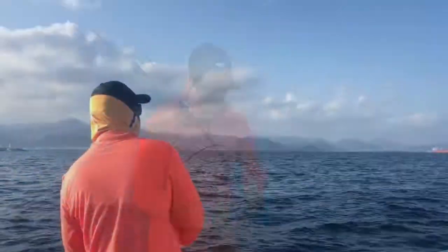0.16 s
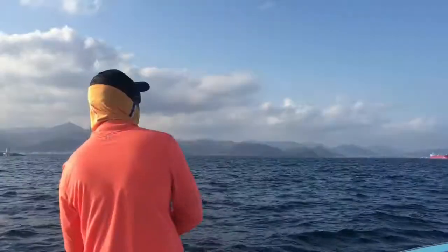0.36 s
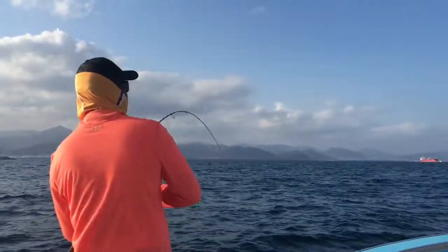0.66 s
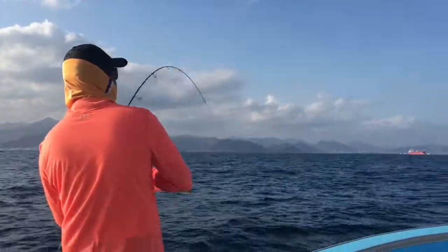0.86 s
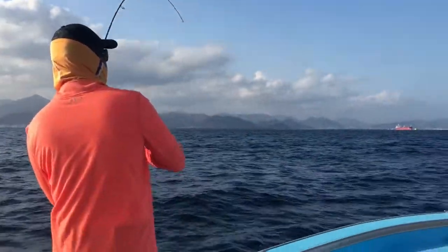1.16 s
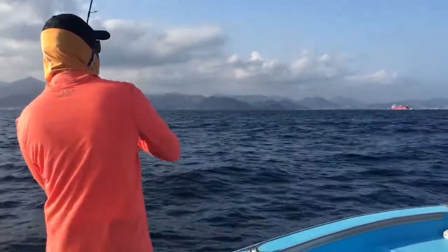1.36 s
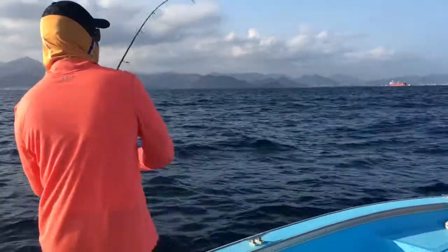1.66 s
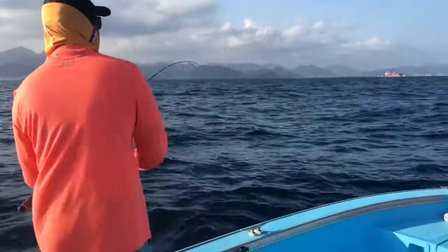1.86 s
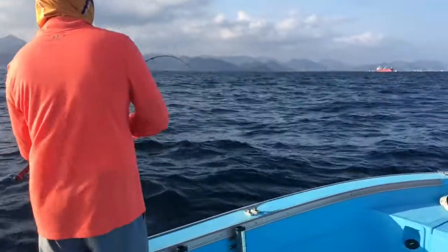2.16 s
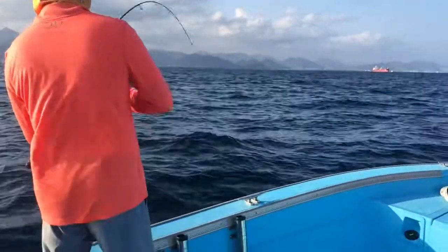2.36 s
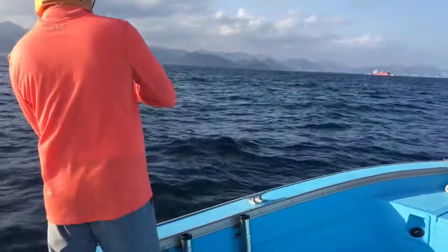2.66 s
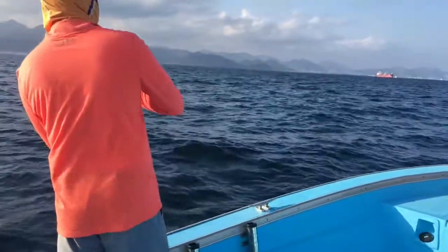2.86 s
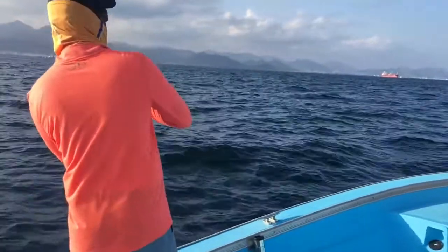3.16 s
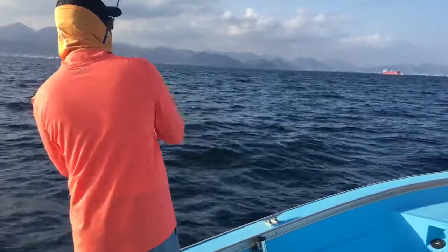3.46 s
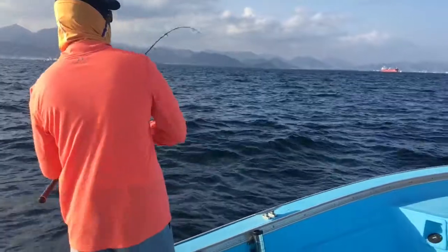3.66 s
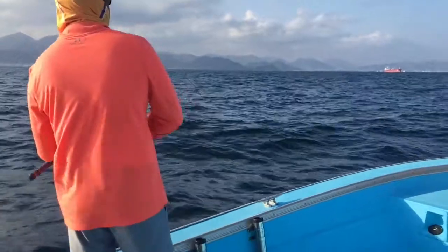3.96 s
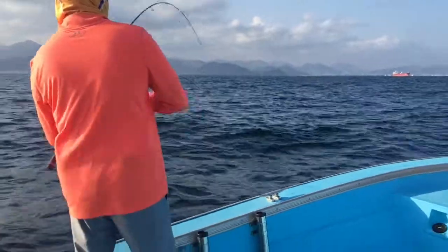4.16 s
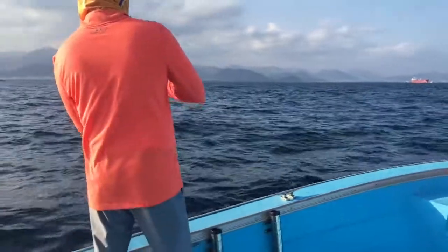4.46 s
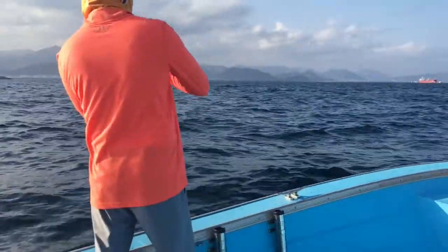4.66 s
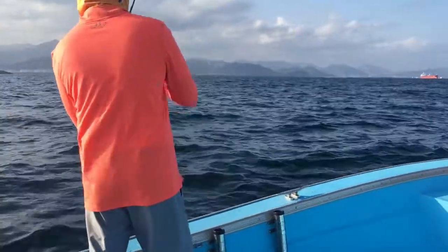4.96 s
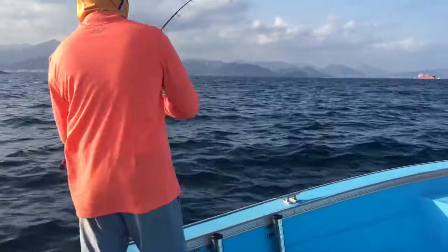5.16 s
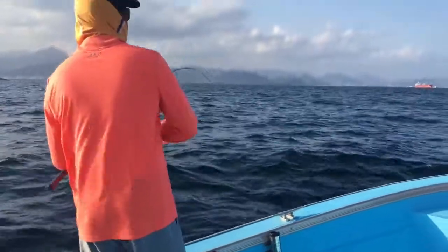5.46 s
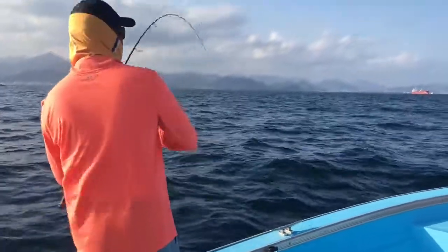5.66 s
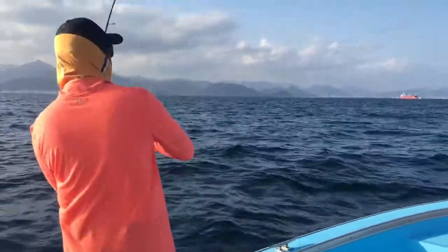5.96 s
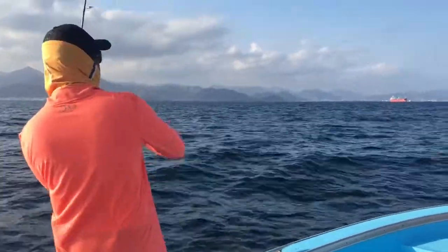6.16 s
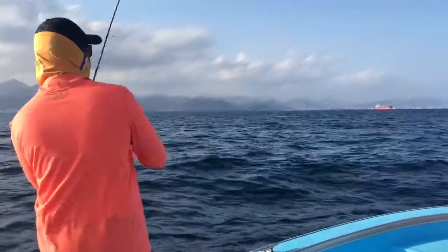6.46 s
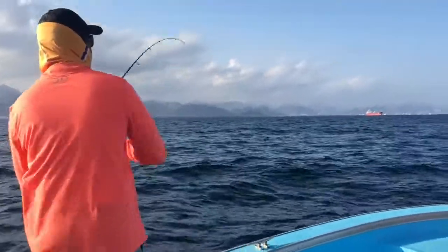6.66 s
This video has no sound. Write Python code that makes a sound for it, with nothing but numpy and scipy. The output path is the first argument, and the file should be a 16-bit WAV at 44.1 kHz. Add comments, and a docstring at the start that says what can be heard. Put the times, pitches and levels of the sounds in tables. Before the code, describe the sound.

Hollow deck knocks, hard clicks and scrapes of fishing gear on a small boat, with wind buffeting and waves slapping the hull.

```python
"""Fishing gear knocks, clicks and scrapes on the hollow deck of a small open boat on a choppy sea.
The blows ring deck and panel resonances; clicks and scrapes are short bursts of shaped noise.
Waves wash, slap and gulp along the hull: shaped noise, clusters of bubble tones and single air pockets.
A freshening wind buffets the microphone with deep noise and thumps, while an idling engine hums faintly
as a few wavering sines. A thin, airy whistle of narrow noise comes and goes."""
import sys
import numpy as np
from scipy import signal
from scipy.fft import rfft, irfft, next_fast_len
from scipy.io import wavfile
from scipy.ndimage import uniform_filter1d, map_coordinates

SR = 44100
rng = np.random.default_rng(int(sys.argv[2]) if len(sys.argv) > 2 else 0)


def unload_wav(signal):
    """Save mono or channel-first audio to the path in sys.argv[1] as 16-bit WAV at rate SR, clipped to [-1, 1]."""
    wavfile.write(
        sys.argv[1],
        SR,
        np.round(np.clip(np.atleast_2d(signal).T, -1, 1) * 32767).astype(np.int16),
    )


N = 300321  # length in samples


def amp(db):
    """Turn decibels into a gain."""
    return 10 ** (np.asarray(db) / 20)


def unit(x):
    """Scale to an rms of 1."""
    return x / np.sqrt(np.mean(x ** 2) + 1e-20)


def curves(rows):
    """Draw straight lines between the rows: one curve for each column after the time."""
    s, *cols = np.transpose(rows)
    return [np.interp(np.arange(N) / SR, s, c) for c in cols]


def wobble(rate, size=N):
    """A smooth random curve through `rate` random points a second."""
    points = rng.standard_normal(int(size * rate / SR) + 4)
    return map_coordinates(points, [np.arange(size) * rate / SR])


def swell(t, rise, fall):
    """A bell-shaped rise to 1 at t = 0, then an exponential fall."""
    return np.exp(-np.where(t < 0, (t / rise) ** 2, np.abs(t) / fall))


def filtered(x, response):
    """Multiply the spectrum of x by a response that depends on frequency."""
    m = next_fast_len(len(x) + SR // 8)
    return irfft(rfft(x, m) * response(np.fft.rfftfreq(m, 1 / SR)), m)[:len(x)]


def coloured(x, spectrum):
    """Shape x by (frequency in Hz, level in dB) points, at an rms of 1."""
    f, db = np.transpose(spectrum)
    return unit(filtered(x, lambda hz: amp(np.interp(np.log(hz + 1), np.log(f), db))))


def resonances(modes, f):
    """Combined response of resonances (Hz, width in Hz, dB), with alternating signs."""
    total = 0
    for k, (c, w, db) in enumerate(modes):
        total = total + (-1) ** k * amp(db) * 1j * f * w / (c * c - f * f + 1j * f * w)
    return total


def patchy(patchy_db):
    """White noise with drifting patches of gain in time and frequency."""
    z = signal.stft(rng.standard_normal(N), nperseg=512)[2]
    field = uniform_filter1d(rng.standard_normal(z.shape), size=6, axis=0)
    field = uniform_filter1d(field, size=8, axis=1)
    return signal.istft(z * amp(patchy_db * unit(field)), nperseg=512)[1][:N]


def add(track, s, sound):
    """Mix a sound into the track from time s in seconds."""
    start = int(np.clip(round(s * SR), 0, N))
    track[start:start + len(sound)] += sound[:N - start]


def bubbles(times, hz, sizes, cycles, glide):
    """Damped sines that rise in pitch as each bubble nears the surface."""
    t = np.arange(SR // 32) / SR
    age = hz[:, None] * t / cycles  # at age 1 the ring has faded by 60 dB
    tone = np.sin(2 * np.pi * cycles * age * (1 + glide * age / 2))
    rings = sizes[:, None] * tone * amp(-60 * age) * (1 - np.exp(-20 * age))
    where = (times * SR).astype(int)[:, None] + np.arange(len(t))
    return np.bincount(where.ravel(), rings.ravel())


def engine():
    """The idling engine hums as a few sines that waver a little in speed and strength."""
    # Engine tones. Each row: frequency in Hz, rms level in dB before the wavering.
    hum = [(110.5, -47.5), (148, -40.5), (252, -54.5)]
    clock = np.cumsum(1 + 0.0047 * wobble(2.97)) / SR  # shared, so the tones drift together
    out = np.zeros(N)
    for hz, db in hum:
        out += amp(db + 0.4 * wobble(1.9)) * np.sqrt(2) * np.sin(2 * np.pi * hz * clock)
    return out


def whistle():
    """A faint, narrow, airy band of noise flickers high above the water."""
    # Spells of whistling. Each row: middle in seconds, level in dB, half length in seconds.
    spells = [(3.71, -66.5, 0.11), (5.1, -74, 0.25)]
    # Colour of the whistle. Each row: frequency in Hz, relative level in dB.
    airy_colour = [(3000, -40), (3900, -7), (4250, 0), (4650, -7), (5600, -40)]
    t = np.arange(N) / SR
    level = sum(amp(db) * np.exp(-((t - s) / half) ** 2) for s, db, half in spells)
    flicker = amp(2.0 * wobble(35))
    return level * flicker * coloured(rng.standard_normal(N), airy_colour)


def wind():
    """Lumpy turbulence on the microphone: the breeze gusts and flutters, with a few big eddies."""
    # The breeze freshens. Each row: time in seconds, relative strength in dB.
    breeze = [(0.0, -35.5), (0.62, -34.5), (1.01, -36), (3.05, -37), (3.66, -32), (4.08, -38.5),
              (5.12, -33.5), (5.48, -37), (5.9, -30.5), (6.33, -34.5), (6.56, -28), (6.81, -27)]
    # Colour of the buffeting. Each row: frequency in Hz, relative level in dB.
    buffet_colour = [(12, -57), (25, -26), (38, -9.5), (54, 0.5), (80, -2), (120, -2.5), (170, -4.5),
                     (230, -10.5), (300, -16), (450, -35), (900, -66), (3000, -109)]
    # Single eddies thump the microphone. Each row: middle in seconds, level in dB, pitch in Hz.
    thumps = [(0.108, -19.5, 109), (0.321, -13, 76), (0.638, -23, 71), (1.561, -17, 68),
              (1.953, -22.5, 71.6), (2.912, -21, 85.5), (3.86, -19.5, 79), (4.213, -17, 54.7),
              (4.966, -13, 103), (5.551, -22, 58.4), (5.795, -21.5, 97), (6.061, -14.5, 109),
              (6.151, -16, 132), (6.309, -12, 172), (6.52, -17.5, 110), (6.651, -19, 80)]
    eddy_cycles = 0.63  # an eddy's push lasts about this many cycles either side of its middle
    strength_db, = curves(breeze)
    gust_db, flutter_db = 1.5 * wobble(5), 2.53 * wobble(24)
    buffet_db = strength_db + 3 + gust_db + flutter_db
    out = amp(buffet_db) * coloured(rng.standard_normal(N), buffet_colour)
    for s, db, hz in thumps:
        turns = (np.arange(SR // 8) - SR // 16) / SR * hz
        push = np.sin(2 * np.pi * turns) * np.exp(-(turns / eddy_cycles) ** 2)
        add(out, s - 1 / 16, amp(db) * push)
    return out


def sea():
    """Waves swell over steady lapping: rushing water with fine bubbles, then a smooth hiss of foam."""
    # Waves run along the hull. Each row: crest in seconds, relative wash level in dB,
    # rise in seconds, fall in seconds.
    waves = [(.3, -46, .3, 0.31), (.68, -53, 0.093, 0.19), (1.24, -41.5, 0.07, 0.41),
             (1.58, -43, 0.074, 0.16), (2.22, -38.5, 0.15, 0.2), (3.0, -48.5, 0.11, 0.074),
             (3.48, -52.5, 0.36, 0.078), (4.02, -45.5, .07, 0.45), (5.06, -48.5, 0.087, 0.18),
             (6.04, -40.5, 0.09, 0.28), (6.28, -39.5, .12, 0.24), (6.69, -45, 0.13, 0.13)]
    # Colours of the rushing water and of the foam. Each row: frequency in Hz, relative level in dB.
    wash_colour = [(100, -39), (250, 12), (400, 5), (650, -2.5), (1000, -4), (1450, -8.5), (2100, -15),
                   (3200, -21.5), (5000, -27.5), (12000, -51)]
    foam_colour = [(1000, 5), (2500, 0.5), (4000, -2), (5000, -6), (6300, -1), (7600, -7), (9500, -5),
                   (10800, -10.5), (12800, -6), (15000, -19), (16000, -17)]
    lapping_db, hiss_db = -53.5, -67.5  # water and hiss that stay between the waves
    foam_db, foam_lag_s, foam_fall_s = -20, 0.15, 0.58  # foam peaks after the crest, then fizzes out
    t = np.arange(N) / SR
    flow_power = amp(lapping_db) ** 2
    froth_power = amp(hiss_db) ** 2
    for s, db, rise, fall in waves:
        flow_power = flow_power + (amp(db) * swell(t - s, rise, fall)) ** 2
        froth = amp(db + foam_db) * swell(t - s - foam_lag_s, rise, foam_fall_s)
        froth_power = froth_power + froth ** 2
    when, pitch, size = rng.random((5000, 3)).T
    # fine bubbles start between 400 and 4800 Hz
    pops = bubbles(when * N / SR, 400 * 12 ** pitch, amp(15 * size ** 2), cycles=22, glide=.14)[:N]
    rush = amp(-0.5) * coloured(patchy(patchy_db=0.5), wash_colour)
    fizz = amp(-3.0) * coloured(np.diff(pops, prepend=0), wash_colour)
    wash = np.sqrt(flow_power) * amp(1.8 * wobble(30)) * (rush + fizz)  # the level is choppy
    foam = coloured(rng.standard_normal(N), foam_colour)
    return wash + np.sqrt(froth_power) * amp(.8 * wobble(11)) * foam


def glugs():
    """A trapped pocket of air swells into a wavering tone, its pitch creeping up as it dies."""
    # Single air pockets gulp under the hull. Each row: peak in seconds, peak level in dB, pitch in Hz,
    # rise in seconds, fall in seconds.
    pockets = [(.198, -40.5, 1665, 0.029, 0.05), (3.03, -35, 401.5, 0.024, 0.029),
               (3.05, -36.5, 667, 0.014, .007), (3.213, -37.5, 890, 0.0041, 0.0048),
               (3.909, -49, 1100, 0.0043, .005), (3.985, -44, 1450, 0.0045, .006),
               (3.852, -39.5, 1320, 0.0079, 0.016), (5.089, -18, 398, 0.013, 0.019),
               (5.095, -24.5, 530, 0.015, 0.015), (5.224, -42, 1323, 0.009, 0.029),
               (5.606, -35.5, 738, 0.0054, 0.0059), (5.63, -31, 670, 0.0024, 0.0033),
               (6.585, -33, 1050, 0.0027, 0.0058), (6.721, -23.5, 536.2, 0.00098, 0.0066)]
    out, t = np.zeros(N), np.arange(-SR // 16, SR // 8) / SR
    for s, db, hz, rise, fall in pockets:
        pitch = hz * (1 + .5 * t + 0.1006 * wobble(239.6, size=len(t)))
        tone = np.sin(2 * np.pi * np.cumsum(pitch) / SR)
        add(out, s + t[0], amp(db) * swell(t, rise, fall) * tone)
    return out


def slaps():
    """Each wave traps a cluster of air pockets and throws up a little spray."""
    # Waves slap the hull. Each row: start in seconds, relative level in dB, middle bubble pitch in Hz,
    # fading time in seconds.
    slap_list = [(0.162, -47.5, 1510, 0.26), (0.353, -30.5, 1066, .021), (0.478, -35, 492, 0.028),
                 (1.535, -30, 990, 0.024), (1.885, -35, 1720, 0.012), (1.93, -40.5, 810, 0.021),
                 (2.129, -36, 990, 0.0088), (2.221, -26, 1173, .012), (2.585, -33, 1280, 0.015),
                 (2.967, -39, 476, 0.036), (2.957, -48.5, 1590, 0.035), (2.999, -42, 1030, 0.03),
                 (3.493, -45.5, 1760, 0.033), (3.522, -36, 747, 0.01), (3.899, -51.5, 1240, 0.12),
                 (4.005, -28, 722, 0.023), (4.019, -30, 406, 0.033), (4.022, -41, 1430, 0.04),
                 (4.986, -38, 456, 0.06), (5.055, -40.5, 1410, 0.022), (5.186, -38.5, 1260, 0.024),
                 (5.701, -48, 370, 0.13), (5.987, -35, 530, 0.028), (6.101, -32, 437, 0.072),
                 (6.63, -36.5, 1180, 0.027), (6.729, -40.5, 1240, 0.035)]
    out, t = np.zeros(N), np.arange(SR // 3) / SR
    for s, db, hz, length in slap_list:
        when, pitch, size = rng.random((60, 3)).T
        spread = (np.arange(len(when)) + when) / len(when)  # one bubble in each equal slice of time
        pitches = hz * 1.8 ** (pitch - .5)
        pockets = bubbles(spread * len(t) / SR, pitches, amp(12 * size), cycles=20, glide=.15)
        pockets = unit(np.pad(pockets, (0, len(t)))[:len(t)])
        spray_colour = [(hz / 3, -22), (hz, 0), (hz * 2, -12), (hz * 8, -36), (hz * 20, -45)]
        spray = coloured(rng.standard_normal(len(t)), spray_colour)
        burst = (1 - np.exp(-t / 0.0013)) * np.exp(-t / length)
        add(out, s, amp(db) * burst * (pockets + .5 * spray))
    return out


def scrapes():
    """Gear and sleeves scrape in short strokes of fine, grainy friction."""
    # Strokes. Each row: peak in seconds, relative level in dB, rise in seconds, fall in seconds.
    strokes = [(.212, -39, 0.0076, 0.019), (.372, -48.5, .01, 0.023), (.596, -38, .006, 0.021),
               (0.652, -37.5, 0.0056, 0.016), (.897, -42, 0.0035, .004), (.919, -41, 0.0078, .014),
               (1.267, -32, 0.017, 0.0097), (1.639, -48.5, 0.0068, .009), (1.692, -39, .006, 0.011),
               (1.743, -46, 0.0052, 0.0086), (1.85, -52, 0.029, .053), (1.983, -40.5, 0.0058, 0.0089),
               (2.23, -53, .015, 0.031), (2.359, -41.5, 0.0089, 0.0058), (2.455, -52.5, 0.013, .02),
               (2.565, -45.5, 0.016, 0.035), (3.19, -59, 0.025, 0.046), (3.39, -58, 0.03, 0.064),
               (3.51, -57, 0.012, .04), (4.09, -57, .012, 0.013), (4.34, -55, .025, .03),
               (5.15, -58, 0.022, 0.034), (6.3, -45.5, 0.014, 0.0079)]
    # Colour of the friction. Each row: frequency in Hz, relative level in dB.
    scrape_colour = [(400, -36), (1300, 2), (2600, 1), (4300, -0.5), (6300, 2), (7500, -2.5), (9000, -2),
                     (11000, -5.5), (13500, -5), (16000, -12)]
    t = np.arange(N) / SR
    stroke = sum(amp(db) * swell(t - s, rise, fall) for s, db, rise, fall in strokes)
    grains = patchy(patchy_db=4.0) * amp(3.2 * wobble(690))
    return stroke * coloured(grains, scrape_colour)


def clicks():
    """Hard parts chatter for a few milliseconds; the deck throws the click back and it rings out."""
    # Hard clicks. Each row: time in seconds, relative level in dB, rough treble tilt in dB per octave.
    click_list = [(0.0992, -31.5, -7), (0.3005, -27, -18), (.3273, -25, -2.5), (0.3529, -20.5, -6.5),
                  (0.444, -34.5, -4), (0.7264, -22, -6), (0.8423, -19.5, -5), (.8976, -17, 0),
                  (.981, -15, .5), (1.1137, -23.5, -9), (1.2124, -25, -11.5), (1.2236, -30, 5),
                  (1.3179, -29, -5.5), (1.5655, -18.5, 1.5), (1.5949, -23, -7.5), (1.8645, -33.5, -9),
                  (1.974, -26.5, -13), (2.157, -40, 6), (2.1927, -21, 0.5), (2.2818, -20, 0.5),
                  (2.3488, -31, -2), (2.506, -36, 0.5), (2.556, -28.5, -9.5), (2.7092, -20.5, -2.5),
                  (2.9114, -20.5, -2), (3.379, -34.5, 0.5), (4.1147, -34.5, -1), (4.8691, -32.5, -3),
                  (6.1412, -25, -1), (6.248, -29, -3), (6.2876, -25, -11)]
    # Resonances of the gear. Each row: frequency in Hz, width in Hz, relative level in dB.
    gear_modes = [(1146, 440, -1.5), (2680, 2130, -0.5), (4440, 630, 3.5), (5990, 1420, -1.5),
                  (9030, 960, 3), (10700, 4500, -4.5), (14900, 2200, -9.5)]
    t60 = 0.079  # seconds for the ring to fade by 60 dB
    out, t = np.zeros(N), np.arange(-SR // 100, SR // 6) / SR
    contact = np.exp(-((t - .002) / 0.0018) ** 2)
    echo = amp(-14) * np.exp(-((t - .012) / .004) ** 2)
    ring = amp(-5) * amp(-60 * np.abs(t) / t60) * (t > 0)
    for s, db, tilt_db in click_list:
        chatter = rng.standard_normal(len(t)) * (contact + echo + ring)
        click = filtered(chatter, lambda f: resonances(gear_modes, f) * amp(tilt_db * np.log2((f + 500) / 6000)))
        add(out, s + t[0], amp(db - 24.5) * unit(click))
    return out


def knocks():
    """A blow booms in the deck and rattles the panels; where it lands sets which resonances speak most."""
    # Gear knocks on the deck. Each row: time in seconds, level in dB, boom pitch in Hz,
    # clack level in dB relative to the boom, clack pitch in Hz.
    blows = [(.102, -28.5, 245, -12.5, 895), (.3, -11.5, 352, -8.5, 1130), (.668, -19, 306, -14, 706),
             (.727, -16, 293, -11, 1040), (0.901, -22.5, 317, -15.5, 1110), (.984, -22.5, 298, -10, 1280),
             (.992, -16.5, 274, -25, 1120), (1.114, -14.5, 287, -14, 800), (1.223, -19, 340, -16, 1425),
             (1.316, -17.5, 275, -23, 700), (1.59, -8.5, 318, -17, 1040), (1.69, -26.5, 430, -35, 700),
             (1.818, -24.5, 305, -46, 700), (2.035, -28, 271, -11.5, 1140), (2.193, -19, 300, -20, 990),
             (2.553, -29, 344, -14.5, 700), (2.713, -5, 288, -20, 990), (3.454, -29, 296, -14, 620),
             (4.871, -14.5, 418, -6, 714), (6.29, -16.5, 244, -17, 1190), (6.453, -23.5, 237, -24, 600),
             (6.718, -24, 410, -13, 690)]
    # Resonances of the hollow deck. Each row: frequency in Hz, relative level in dB,
    # time to fade by 60 dB in seconds.
    deck_modes = [(138, -3, 0.36), (246, 5.5, 0.033), (279.6, -1, 0.17), (316.3, -0.5, 0.14),
                  (382.2, -1.5, 0.14), (427.5, -1.5, 0.096), (533.5, -4, 0.14)]
    # Stiffer panels that clack. Each row: frequency in Hz, width in Hz, relative level in dB.
    panel_modes = [(550, 114, 12), (683, 238, 6.5), (846, 96, 5.5), (1040, 164, 3.5), (1226, 204, 3.5),
                   (1330, 160, 4.5), (1820, 310, -0.5), (1954, 220, 0.5), (3280, 1500, -11)]
    out, t = np.zeros(N), np.arange(SR // 4) / SR
    hz, mode_db, t60 = np.transpose(deck_modes)[:, :, None]
    sign = (-1) ** np.arange(len(hz))[:, None]
    for s, db, boom_hz, clack_db, clack_hz in blows:
        # resonances near the blow's pitches ring most, in the deck and in the panels
        away_db = 10.4 * np.abs(np.log2(hz / boom_hz))
        strength = amp(mode_db + 2 * rng.standard_normal(hz.shape) - away_db)
        boom = np.sum(sign * strength * np.sin(2 * np.pi * hz * t) * amp(-60 * t / t60), axis=0)
        fade = amp(-60 * t / 0.052) + amp(2.0) * amp(-60 * t / 0.13)
        rattle = rng.standard_normal(len(t)) * fade
        panels = [(c, w, level - 5 * abs(np.log2(c / clack_hz))) for c, w, level in panel_modes]
        clack = filtered(rattle, lambda f: resonances(panels, f))
        clack = clack / np.std(clack[:SR // 80])
        blow = boom / np.abs(boom).max() + amp(clack_db) * clack
        add(out, s - .001, amp(db) * blow * (1 - np.exp(-t / 0.00059)))
    return out


def scene():
    """Everything reaches one microphone in the open air."""
    water = sea() + slaps() + glugs()
    gear = knocks() + clicks() + scrapes()
    return (wind() + engine() + whistle() + water + gear)[None]


def record(dry):
    """Cut the sound off steeply above the top frequency."""
    top_hz = 15900
    return filtered(dry[0], lambda hz: 1 / np.sqrt(1 + (hz / top_hz) ** 200))[None]


dry = scene()
out = record(dry)
unload_wav(out)
```